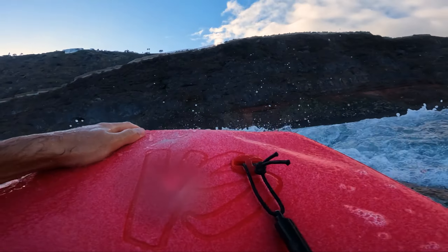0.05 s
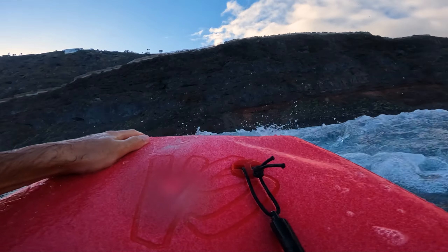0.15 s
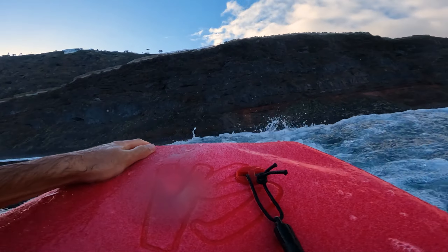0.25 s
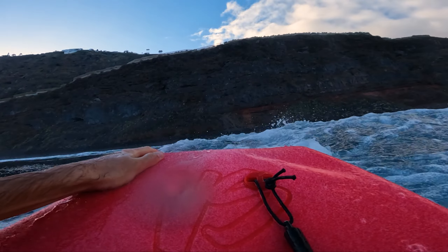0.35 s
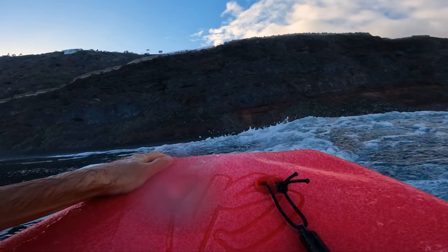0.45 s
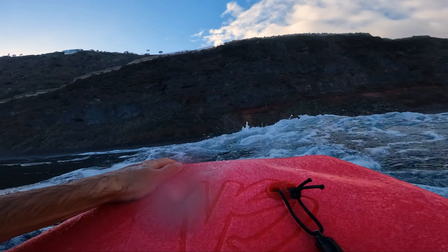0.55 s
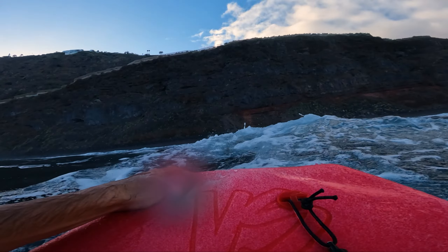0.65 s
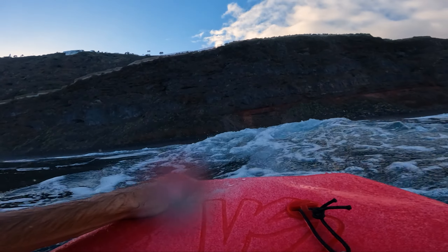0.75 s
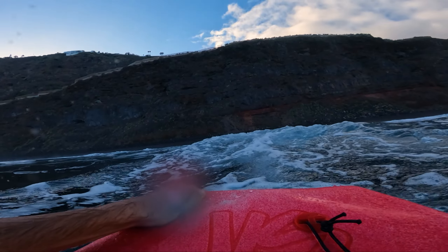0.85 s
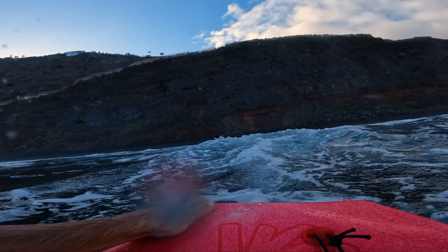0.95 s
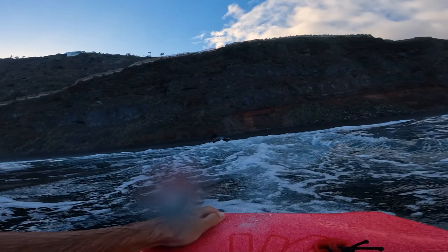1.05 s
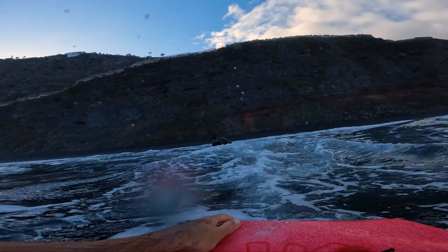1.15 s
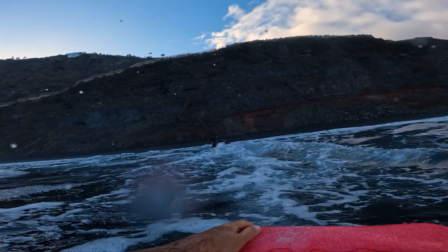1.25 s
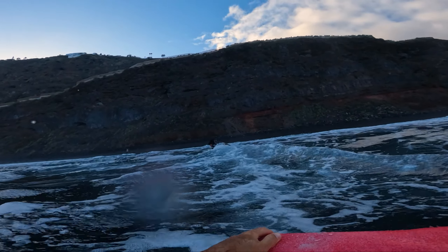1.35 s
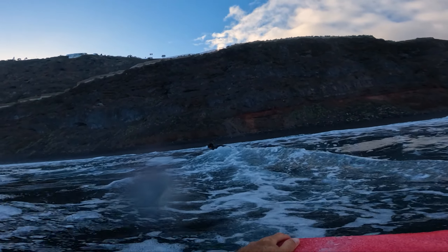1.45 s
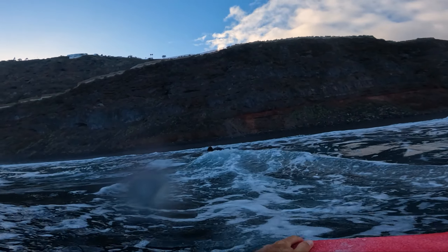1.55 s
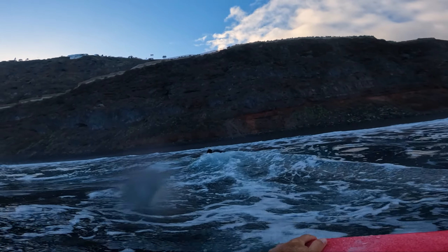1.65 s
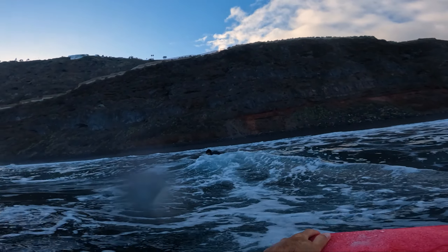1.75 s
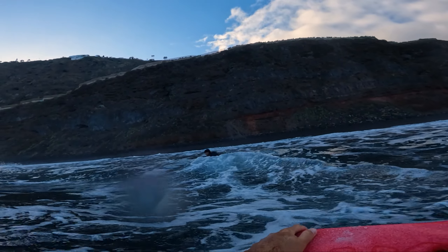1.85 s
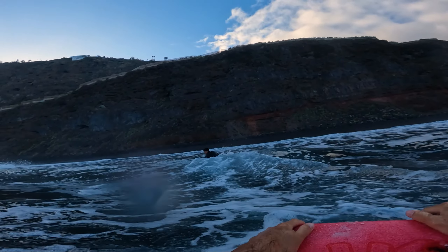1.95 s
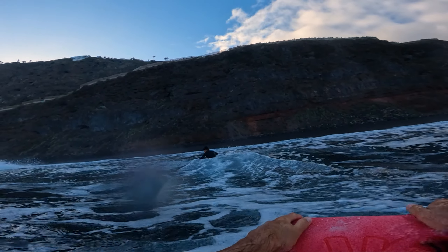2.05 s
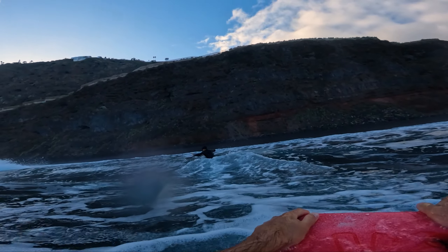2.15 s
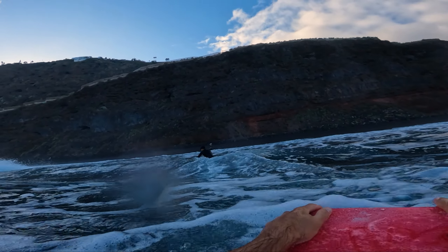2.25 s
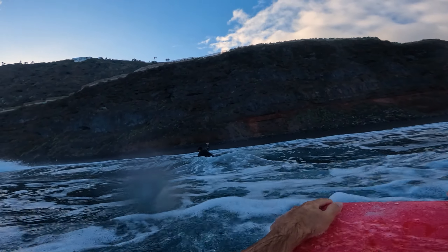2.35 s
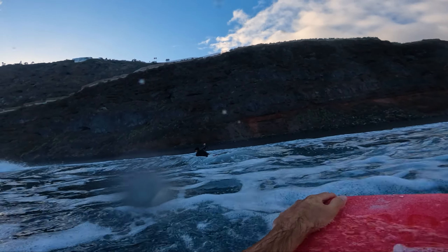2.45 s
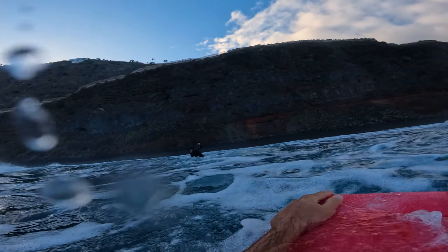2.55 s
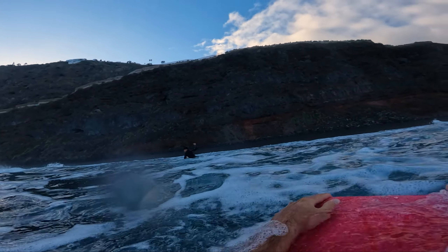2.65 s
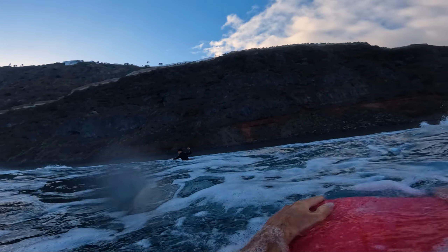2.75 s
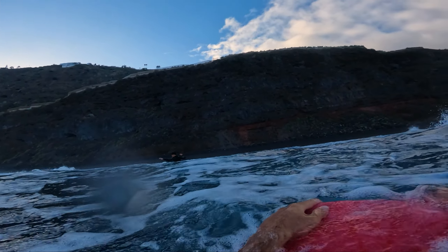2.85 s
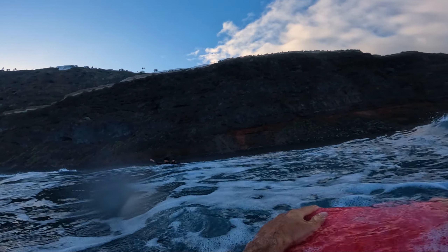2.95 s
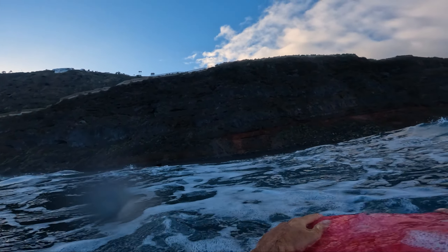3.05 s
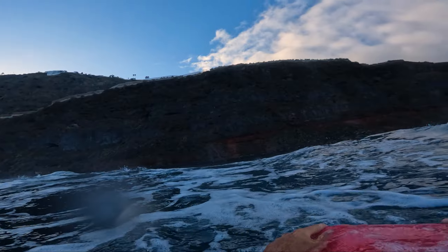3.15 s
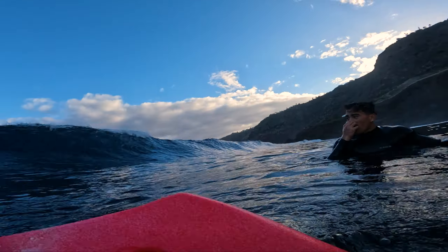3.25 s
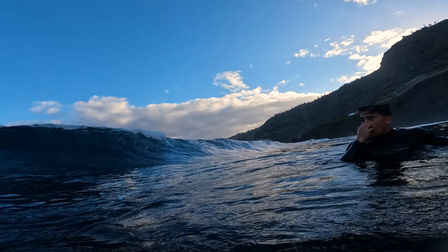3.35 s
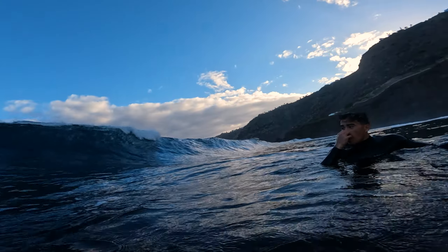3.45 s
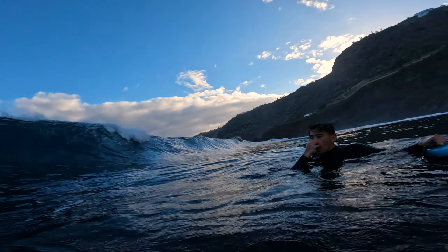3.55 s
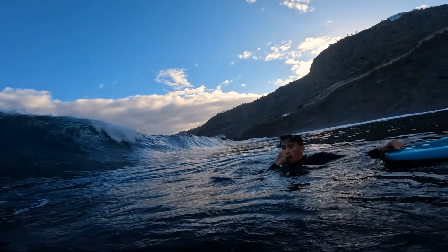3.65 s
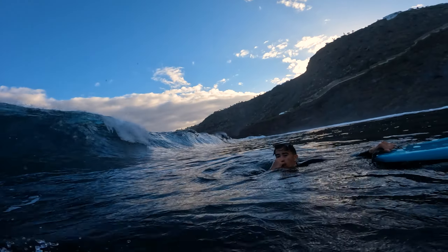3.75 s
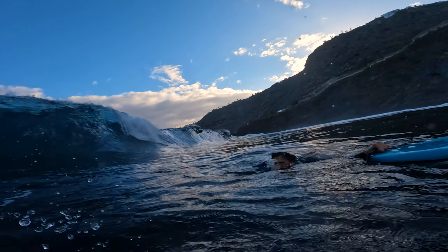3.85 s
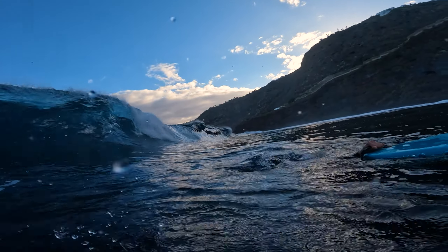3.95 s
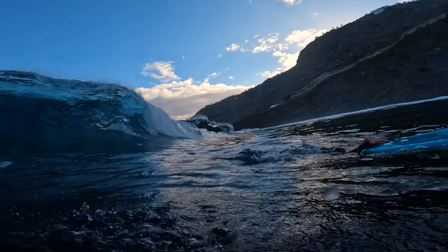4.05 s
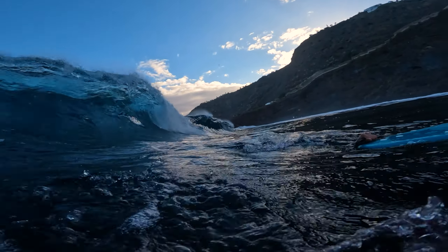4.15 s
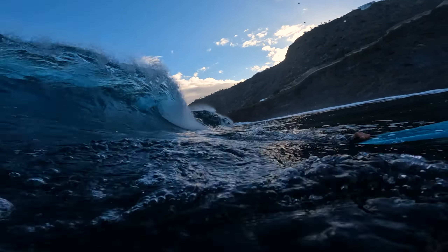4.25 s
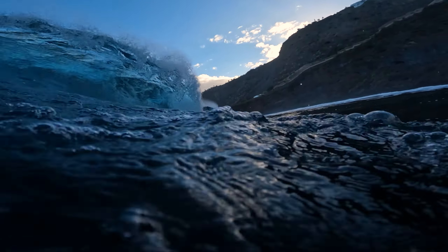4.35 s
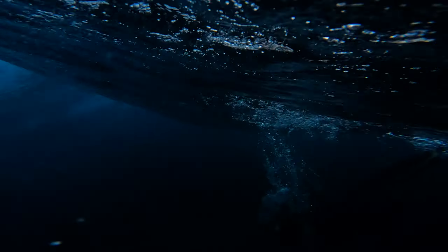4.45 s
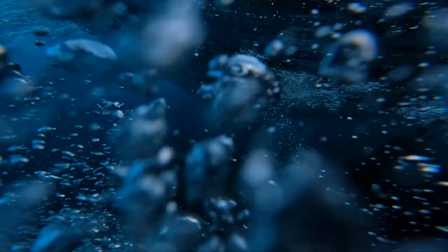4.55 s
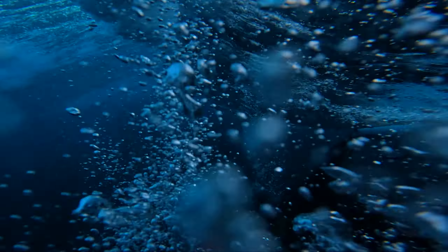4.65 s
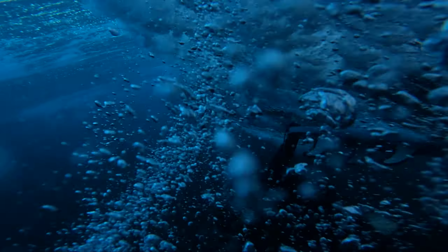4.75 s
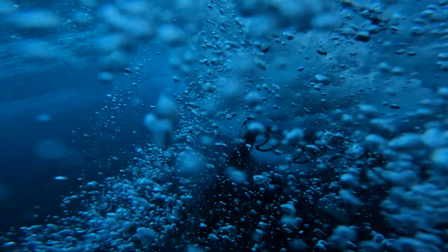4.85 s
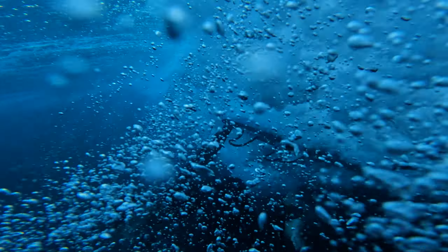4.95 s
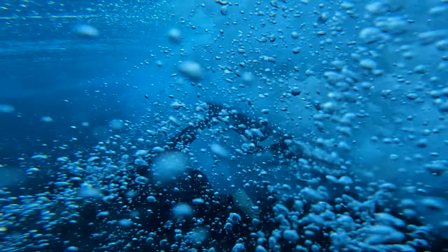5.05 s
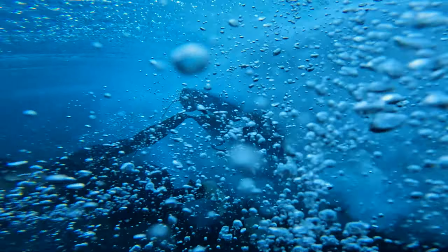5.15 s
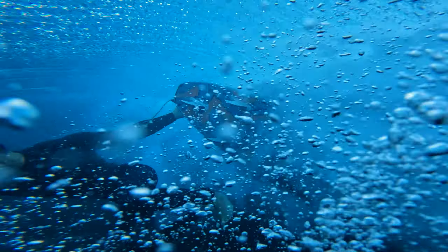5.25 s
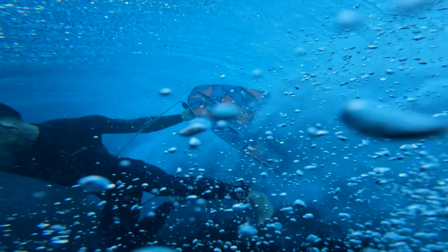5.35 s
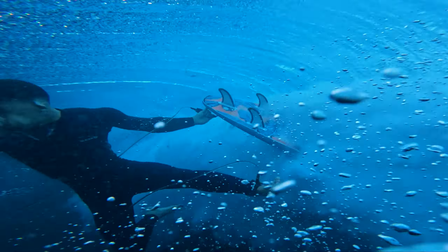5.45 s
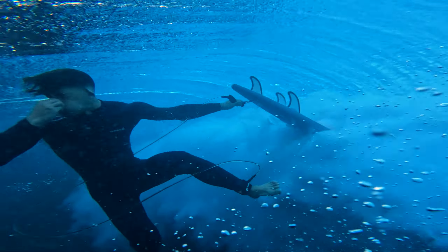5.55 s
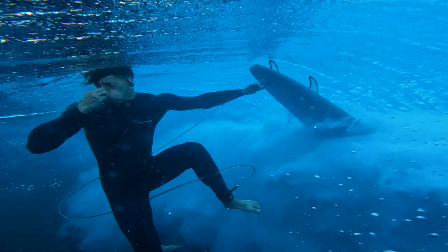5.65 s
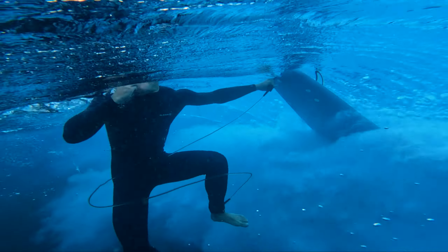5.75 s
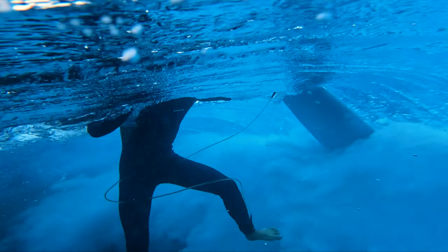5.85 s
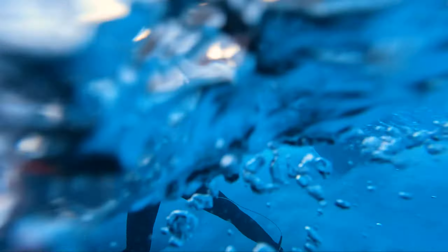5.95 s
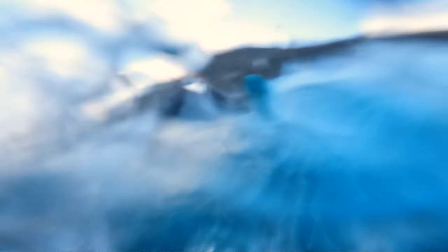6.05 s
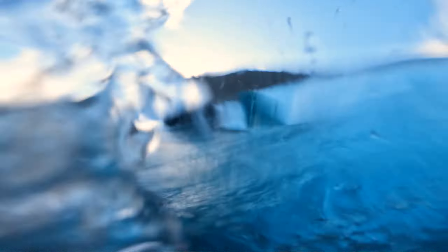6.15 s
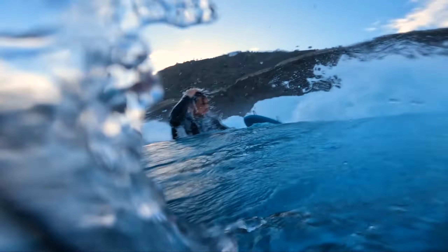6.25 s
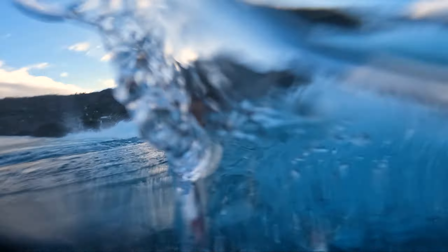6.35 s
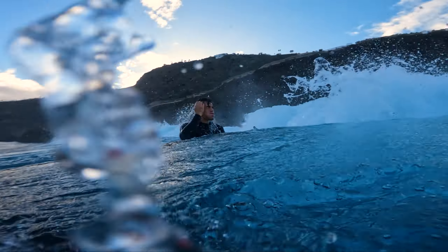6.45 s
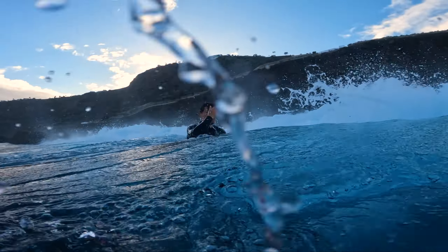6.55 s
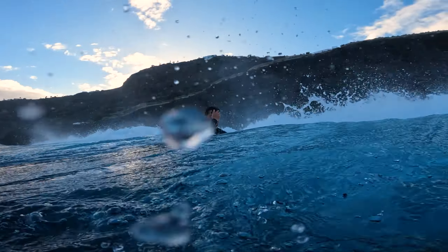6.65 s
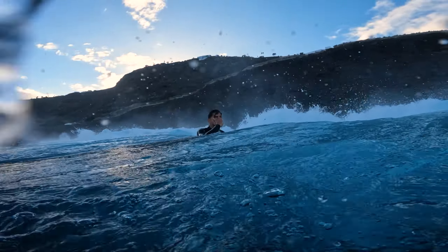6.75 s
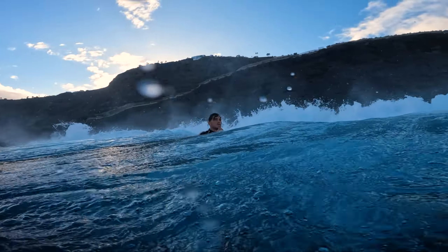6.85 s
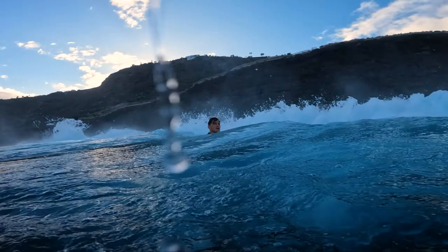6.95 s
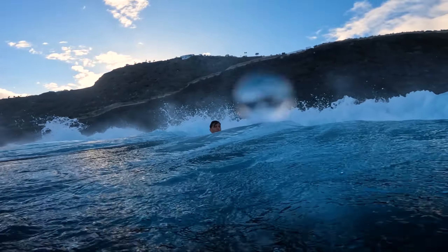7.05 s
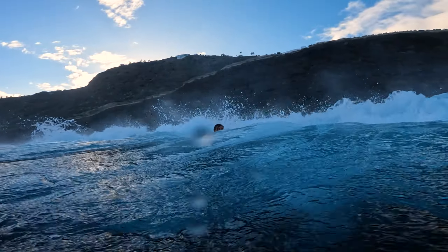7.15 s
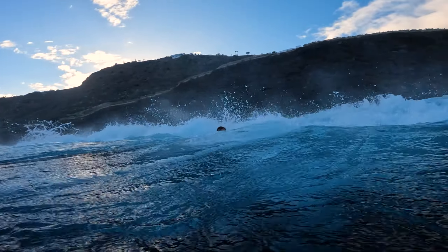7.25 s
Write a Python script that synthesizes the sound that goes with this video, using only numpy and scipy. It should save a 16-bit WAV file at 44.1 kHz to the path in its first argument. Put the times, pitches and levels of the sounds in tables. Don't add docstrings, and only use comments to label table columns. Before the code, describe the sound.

Close on a board in the surf, a microphone behind a soaked waterproof cover hears dull roaring water with faint foam hiss. The scene cuts to quieter, heaving swell; a wave slams with a boom and brief bright rush. Underwater, the roar turns hollow with gurgling bubbles, then the camera surfaces in thick glugs, slaps and draining water.

```python
import sys
import numpy as np
from scipy import signal
from scipy.io import wavfile
from scipy.ndimage import uniform_filter1d

SR = 44100
rng = np.random.default_rng(int(sys.argv[2]) if len(sys.argv) > 2 else 0)


def store_wav(level_fs):
    pcm = np.round(np.clip(np.atleast_2d(level_fs), -1, 1) * 32767)
    wavfile.write(sys.argv[1], SR, pcm.T.astype(np.int16))


def level_to_linear(level):
    exponent = np.asarray(level, float) / 20
    return 10 ** exponent


N = 321930

# time [s], force [dB], weight of water [dB],
# air trapped in the port [dB].
SURF_COURSE = [(0.0, -27, -2.5, -7), (0.47, -29, 4, -1), (0.6, -25.5, 2.5, -0.5), (1.25, -21.5, 3.5, -7),
               (1.8, -18.5, -7.5, -4), (2.05, -20.5, -2.5, -2.5), (2.62, -18, -5, -11.5),
               (3.312, -19.5, -3, -4.5), (3.322, -33.5, 1, -1), (3.92, -30.5, -4, 1.5),
               (4.47, -23.5, 0.5, 0.7), (4.62, -14, -4, -11), (4.95, -26, 4.5, -1), (5.36, -22, -4, -18),
               (5.8, -25, 4, 0.5), (6.8, -21, 1.5, -4), (6.89, -27, -0.5, -4), (7.29, -21, -3, -6.5)]
# time [s], strength [dB],
# half length [s], pitch [Hz].
PORT_GULPS = [(1.524, -4.5, 0.26, 250), (3.452, -10, 0.049, 706), (3.528, -4, 0.065, 593),
              (3.688, 11.5, 0.029, 320), (3.767, -0.5, .06, 250), (3.921, 6, 0.016, 606),
              (4.057, 10, 0.19, 70), (4.492, 10.5, 0.028, 250), (4.511, -15.5, 0.063, 402),
              (4.565, 16.5, 0.044, 560), (4.675, 1.5, 0.055, 189), (5.38, 6, 0.07, 230),
              (5.443, -8.5, 0.023, 236), (5.52, 4.5, 0.048, 250), (5.574, -4, 0.036, 150),
              (5.784, -6, 0.031, 250), (5.831, 7, 0.037, 199), (5.996, 8.5, 0.099, 620),
              (6.088, 9, 0.076, 60), (5.449, 14.5, 0.049, 750), (6.125, 21, 0.014, 200),
              (6.138, -16, 0.096, 200), (6.194, 24, 0.025, 151), (6.256, -12, 0.082, 120),
              (6.278, 16, 0.016, 80), (6.395, -6.5, 0.082, 606), (6.426, 8, 0.086, 60),
              (6.446, -11, 0.054, 80.4), (6.59, -11, 0.098, 196), (6.823, 2, 0.016, 298),
              (3.353, -16, 0.046, 150), (3.523, 5.5, 0.043, 190), (5.867, -16.5, .014, 700),
              (6.233, -12, 0.047, 700), (6.36, -5, 0.016, 500), (6.54, 4, 0.032, 600),
              (4.303, -2.5, 0.14, 750), (5.297, 2, 0.083, 230), (1.93, 1.5, 0.069, 560),
              (6.673, 1, 0.033, 700)]
# time [s], pitch [Hz].
PORT_PITCH = [(0, 553), (3.31, 555), (3.33, 599), (4.2, 665.5), (4.55, 554), (4.68, 710), (4.78, 852),
              (4.9, 778), (4.96, 618), (5.15, 634), (5.3, 737), (5.5, 652), (5.63, 843), (5.85, 676),
              (5.96, 579), (6.01, 718), (6.04, 595), (7.3, 585)]
# time [s], submerged share [0-1].
DEPTH = [(0, 0), (4.45, 0.16), (4.58, 0.06), (4.66, 0.36), (4.9, 0.74), (5.55, 0.95), (5.8, 0), (6.1, 0.28),
         (7.3, 0.02)]
# time [s], share [0-1].
PORT_WETNESS = [(0, 0.07), (4.5, 0.55), (4.58, 0.74), (6.8, 1), (6.9, 0.4), (7.3, 0.1)]
# frequency [Hz], level [dB per Hz].
MUFFLED_TONE = [(12, -32), (20, -6.5), (52, 5), (82, 2), (233, -4.5), (293, -2.5), (461, -6), (605, -6),
                (1040, -27.5), (1140, -31), (1800, -51.5), (2370, -58), (4580, -67), (5950, -96.5),
                (10100, -120)]
# frequency [Hz], level [dB per Hz].
DROWNED_TONE = [(59, -30.5), (100, -9), (184, -9.5), (315, -13.5), (362, -19), (533, -30.5), (627, -5.5),
                (744, -9), (1300, -33.5), (1690, -61.5), (2860, -120)]
# time [s], foam [dB], brightness [dB].
FOAM_COURSE = [(0.0, -47, -20), (0.46, -46.5, -20), (1.0, -39.5, -11), (1.57, -46.5, -17), (1.95, -36, -19),
               (2.26, -43, -20.5), (2.68, -40.5, -17.5), (3.15, -43.5, -19.5), (3.312, -39.5, -17),
               (3.322, -53, -15), (3.51, -39.5, -18.5), (3.88, -43.5, -21.5), (4.1, -36.5, -20.5),
               (4.41, -35.5, -21.5), (4.6, -31, -16), (5.03, -54, -27.5), (5.6, -52.5, -9.5),
               (7.29, -54.5, -13.5)]
# time [s],
# strength [dB], half length [s], brightness [dB].
SPLASHES = [(0.113, -2.5, 0.11, -2), (0.78, 12, 0.02, -18), (0.81, -4.5, 0.096, 0), (1.198, -1, 0.017, -5),
            (1.229, 13, 0.025, -5.5), (1.828, 4.5, 0.048, -2.5), (1.275, 1.5, 0.11, 5),
            (3.452, -9.5, 0.058, 4.5), (3.696, 1.5, 0.015, 7.5), (4.486, 3.5, 0.063, -1),
            (4.548, -4, 0.062, 6), (4.874, 7.5, 0.14, -3), (5.137, 9, 0.19, -1.5), (5.298, -2, .03, 7.5),
            (5.453, -10, 0.031, 13), (5.48, -10, 0.042, 4), (5.526, 4, 0.046, 1.5),
            (5.628, 19.5, 0.045, -21), (5.728, 6, 0.11, 5.5), (5.835, 14.5, 0.028, -5),
            (5.866, -15, 0.022, -1), (5.942, 14, 0.016, -5), (6.043, 0, 0.059, 11.5),
            (6.09, 16.5, 0.16, -1.5), (6.21, -18, 0.035, 11), (6.33, 6, 0.044, -2), (6.398, -11, 0.062, 13),
            (6.453, 16, 0.018, -11.5), (6.73, 9.5, 0.13, 5.5), (7.124, 9.5, 0.28, -8), (3.61, 2, 0.069, 1),
            (3.983, -1.5, 0.037, 3), (6.005, 1.5, 0.036, 10), (6.131, -18, 0.0079, 0),
            (6.153, -4, .006, -3), (6.18, 7, .02, -12), (6.525, 6.5, 0.058, 2), (6.66, 11, 0.019, -10),
            (5.89, 1, .02, -2), (5.565, 12, 0.024, -15), (1.004, 0.5, 0.071, -4.5), (5.97, -4, 0.017, 11.5)]
# frequency [Hz], level [dB per Hz].
SPRAY_TONE = [(1200, -16), (2100, -1.5), (3050, -6), (3900, -14.5), (5500, -23), (7500, -34),
              (11000, -66.5)]
# time [s], level [dB].
HEAVE_COURSE = [(0.0, -34), (0.41, -53.5), (1.97, -22), (3.31, -32.5), (3.32, -29), (3.37, -17),
                (3.61, -26), (3.81, -15), (3.98, -20), (4.03, -25.5), (4.19, -32.5), (4.47, -33),
                (4.47, -15.5), (4.82, -40.5), (5.6, -18.5), (6.3, -33), (6.81, -41), (7.29, -38)]
# start [s], peak [dB], pitch [Hz].
GLUGS = [(0.554, -9, 552), (2.003, -9, 553), (3.524, -10, 503), (4.622, -3, 622), (4.681, -9, 755),
         (4.776, 0, 423), (4.801, -10.5, 877), (4.824, -9, 830), (4.877, -7, 786), (4.952, -9, 583),
         (4.982, -14.5, 722), (5.185, -16.5, 720), (5.441, -10, 688), (5.542, -4, 567), (5.574, -8, 526),
         (5.616, -19.5, 866), (5.744, -7, 633), (5.811, -21, 662), (5.85, 0.5, 510), (5.909, -9, 715),
         (5.943, -2, 570), (5.999, -0.5, 643), (6.021, 5, 552), (6.115, -6, 357), (6.281, -1, 355),
         (6.332, -0.5, 487), (6.387, -8, 432), (6.448, -6.5, 552), (6.737, -10, 517),
         (3.647, -10, 622), (3.929, -17, 800), (4.093, -28, 593), (4.215, -18, 770), (4.312, -9, 547),
           (4.552, 4, 533), (4.652, -14, 640), (4.714, -19, 450), (4.736, -22, 680), (4.905, -13, 438),
           (5.019, -17, 693), (5.109, -22, 627), (5.136, -21.5, 616), (5.157, -19, 618), (5.227, -20, 810),
           (5.348, -17.5, 810), (5.629, -15, 750), (5.649, -17, 860), (5.691, -19, 637), (5.709, -10, 523),
           (5.787, -16, 708), (5.88, -15, 555), (5.975, -13, 597), (6.51, -12, 543), (6.534, -20, 565),
           (6.554, -26, 650), (6.649, -19, 655), (6.334, -16.5, 613)]
# start [s], peak [dB], pitch [Hz].
BLIPS = [(1.2161, -29, 1140), (3.549, -36, 1090), (3.5975, -23.5, 1140), (3.693, -16.5, 1040),
         (3.9766, -24, 1070), (4.6823, -14, 1200), (4.786, -26, 1460), (4.8803, -32.5, 1280),
         (4.9054, -19.5, 1190), (4.979, -28, 1220), (5.095, -28, 1160), (5.187, -39, 1500),
         (5.3454, -28, 1040), (5.3906, -25.5, 1020), (5.408, -42, 1480), (5.04, -34, 1260),
         (5.6158, -20, 1245), (5.639, -39, 1120), (5.649, -37, 1090), (5.7444, -39, 1060),
         (5.7818, -37, 1460), (5.8247, -34, 1410), (5.9714, -27.5, 1340), (5.9887, -23, 1080),
         (6.0107, -16, 1100), (6.044, -23, 1260), (6.0736, -24, 1080), (6.309, -37, 1060),
         (6.323, -36, 1070), (6.4305, -32.5, 1310), (6.4457, -21.5, 1120), (6.5124, -33, 1060),
         (6.647, -37, 1040)]
# start [s], peak [dB], pitch
# [Hz].
PLINKS = [(0.765, -31, 1950), (.766, -29, 2590), (1.134, -25, 1900), (1.216, -32.5, 1790),
          (4.486, -16, 1600), (4.4948, -2, 1596), (4.5224, -21, 1630), (4.744, -36, 4000),
          (4.754, -28, 2060), (4.786, -22.5, 1710), (4.837, -36, 1740), (4.8796, -29, 1860),
          (4.9135, -27, 1870), (4.956, -27.5, 1980), (5.125, -39, 2670), (5.128, -23.5, 1750),
          (5.297, -35.5, 1674), (5.731, -34, 1800), (5.831, -32.5, 1620), (5.943, -11.5, 1236),
          (6.165, -37, 1820), (6.004, -26, 1810), (6.0473, -26, 2090), (5.165, -39.5, 2060),
          (6.156, -43, 1730), (6.4449, -37.5, 1880), (6.4977, -37, 1900), (6.5347, -36.5, 1950),
          (5.195, -40, 1850), (5.5812, -44, 2070), (5.6244, -49, 3140), (5.6386, -44, 2220),
          (5.7039, -35.5, 2660), (5.8321, -33, 2160), (5.8835, -55, 2310), (5.9574, -47, 2080),
          (5.9718, -44, 2360), (5.9818, -32, 2060), (5.9964, -41, 2310), (6.0164, -40, 2160),
          (6.0264, -35, 2420), (6.0364, -40, 2010), (6.0472, -36, 2210), (6.0594, -41, 2220),
          (6.0731, -37, 2660), (6.0824, -48, 2230), (6.1024, -47, 2790), (4.995, -49, 2100),
          (6.5124, -51, 2010), (6.6473, -53, 2010)]
# start [s], peak [dB], pitch [Hz], 60 dB decay [s].
MESH_RINGS = [(4.739, -51, 4230, 0.072), (4.762, -21, 877, 0.16), (4.832, -18, 825, 0.2),
              (4.844, -23, 1250, 0.059), (5.945, -35.5, 1250, 0.052), (5.946, -39, 1880, 0.056),
              (6.094, -40, 1800, 0.05), (6.162, -47.5, 1800, 0.1), (5.20, -25, 748, 0.14),
              (5.44, -15, 658, 0.2), (5.708, -58, 4000, 0.041), (5.452, -44, 1510, 0.081)]
# start [s], peak [dB], pitch [Hz].
THUDS = [
    (4.493, 5, 63.8),
    (5.785, -3.5, 86.7),
    (5.939, -19.5, 71.1),
    (6.271, -9, 74.5),
    (6.478, 4, 83),
    (6.661, -17, 102),
    (4.616, -5, 199),
    (4.65, 21, 184),
    (6.196, 9, 292),
    (6.822, 11.5, 558),
]
# start [s], peak [dB], dull part above the bright [dB],
# length [s].
DROPS = [(0.767, -42, -1, 0.005), (0.81, -58, 2, .0009), (3.387, -53, -3, 0.002),
         (3.6854, -52, -14, 0.0023), (4.495, -10, 2.5, 0.0027), (4.528, -20, -2, 0.0013),
         (4.5306, -14, -8, 0.0019), (4.548, -29, 13.5, 0.0019), (4.617, -40, 4, 0.003),
         (4.712, -39, 12, 0.0036), (4.835, -42, 0, 0.0022), (4.877, -41.5, 5, 0.0074),
         (5.675, -50, -4, .0026), (5.705, -43, 7, 0.0017), (5.73, -48, 10, 0.0031), (5.824, -51, 8, 0.0011),
         (5.939, -54, -7, .0026), (6.007, -45, 2, 0.0014), (6.0726, -46, 2, 0.0016),
         (6.3376, -49, 8, 0.004), (6.649, -52, 6, .002), (6.717, -50, -3, 0.0014), (4.738, -46, -2, .0015),
         (5.672, -48, -3, 0.0013), (0.782, -42, 4, 0.0025), (5.798, -51, 2, 0.0011),
         (5.884, -63, 15, 0.0022), (6.037, -44, -1, 0.00084), (6.061, -45, 0, .0015),
         (6.105, -45, -2, 0.0014), (6.31, -58, 13, 0.0022), (6.447, -61, 15, 0.0028),
         (6.512, -64, 10.5, .002), (6.826, -52, 5, .002), (5.772, -56, 0, .0015), (5.957, -52, 0, 0.0018)]
# start [s], peak [dB], dull part above the bright [dB], length [s].
SLAPS = [
    (1.136, -43, 3, .0015),
    (1.2145, -30, 3, .007),
    (6.114, -36, 7, .0012),
    (6.138, -29, 5, .0012),
    (6.1555, -29, 4, .0015),
    (6.199, -52, 3, .001),
]
# start [s], level [dB], pitch [Hz], length [s].
MISTS = [
    (0.858, -55.5, 2950, 0.25),
    (1.245, -61, 3480, 0.13),
    (6.08, -66, 4900, 0.072),
    (6.167, -68, 4840, 0.028),
]
# time [s], level [dB].
SLAM_COURSE = [(4.506, -52), (4.519, -24), (4.533, -14), (4.542, -17), (4.552, -20), (4.57, -33),
               (4.62, -38), (4.72, -38.5), (4.745, -68)]
# frequency [Hz], level [dB per Hz].
SLAM_TONE = [(700, -2.5), (1400, -1.5), (1900, -12.5), (2900, -20), (4500, -33.5), (6500, -41.5),
             (9500, -62.5), (13000, -71), (16000, -99)]
# time [s], height [dB].
JUMPS = [
    (3.3184, -11),
    (3.3248, -30),
    (4.496, -38),
    (5.673, -42),
    (5.678, -37),
    (5.684, -40),
    (6.826, -54),
    (5.553, -60),
    (6.281, -57),
    (6.378, -57),
]

SOAKED = 0.71


def evened(x):
    return x / np.sqrt(np.mean(x ** 2) + 1e-20)


def read(points, hz):
    f, value = np.transpose(points)
    return np.interp(np.log(hz + 1), np.log(f + 1), value)


def follow(*tables):
    s, *columns = np.concatenate(tables).T
    return [np.interp(np.arange(N) / SR, s, c) for c in columns]


def swells(times, halves, heights):
    out = np.zeros(N)
    for s, half, db in zip(times, halves, heights):
        away = np.abs(np.arange(-half, half, 1 / SR)) / half
        add(out, s - half, db * np.minimum(1.065 * (1 - away), 1))
    return out


def add(mix, s, sound):
    part = mix[round(s * SR):][:len(sound)]
    part += sound[:len(part)]


def flutter(hz):
    return evened(signal.sosfilt(signal.butter(2, hz, fs=SR, output="sos"), rng.standard_normal(N)))


def clicks(per_s, spread_db):
    size = level_to_linear(spread_db * np.minimum(rng.exponential(1, N), 4))
    sign = rng.choice([-1., 1.], N)
    return evened(size * sign * (rng.random(N) < per_s / SR))


def blend(a, b, share):
    share = np.clip(share, 0, 1)
    return np.sqrt(1 - share) * a + np.sqrt(share) * b


def colour(x, tone, lo_hz, hi_hz, patchy_db):
    hz, _, z = signal.stft(x, SR, nperseg=1024, noverlap=768)
    band = 1 / np.sqrt((1 + (lo_hz / (hz + 1)) ** 8) * (1 + (hz / hi_hz) ** 8))
    patches = uniform_filter1d(rng.standard_normal(z.shape), size=6, axis=0)
    patches = uniform_filter1d(patches, size=8, axis=1)
    z = z * (band * level_to_linear(read(tone, hz)))[:, None] * level_to_linear(patchy_db * evened(patches))
    return evened(signal.istft(z, SR, nperseg=1024, noverlap=768)[1][:N])


def resonate(x, hz, width):
    turn = np.exp(2j * np.pi * np.cumsum(hz) / SR)
    r = np.exp(-np.pi * width / SR)
    return 2 * (turn * signal.lfilter([1 - r], [1, -r], x / turn)).real


def dulled(x, hz):
    return signal.sosfilt(signal.butter(4, hz, fs=SR, output="sos"), x)


def bubble(db, hz, t60, rise, onset=3):
    t60 = np.clip(t60, .008, .2)
    t = np.arange(0, t60, 1 / SR)
    swing = np.sin(2 * np.pi * hz * (t + rise * t ** 2 / t60))
    fade_in = np.sin(np.pi / 2 * np.minimum(t * hz / onset, 1)) ** 2
    return level_to_linear(db - 60 * t / t60) * swing * fade_in


def surf_controls():
    force_db, weight_db, air_db = follow(SURF_COURSE)
    s, db, half, hz = np.transpose(PORT_GULPS)
    reach = 1.25
    low, mid, top = (swells(s, half, db * np.exp(-(np.log2(hz / layer_hz) / reach) ** 2))
                     for layer_hz in (70, 250, 556))
    bubbling = .3 + np.maximum(follow(PORT_WETNESS)[0] - SOAKED, 0)
    return force_db + weight_db + low, force_db + mid, force_db + air_db + top, bubbling


def port_pockets(depth):
    pitch = follow(PORT_PITCH)[0] * (1 + 0.089 * flutter(hz=29.2))
    ringing = resonate(clicks(550, spread_db=1.5), pitch, 55)
    ringing = resonate(ringing, pitch, 530)
    pockets = evened(dulled(ringing, hz=1250))
    thin = signal.sosfilt(signal.butter(4, 580, "highpass", fs=SR, output="sos"), pockets)
    return (1 - depth) * pockets + depth * evened(thin)


def surf():
    rumble_db, roar_db, port_db, bubbling = surf_controls()
    depth = follow(DEPTH)[0]
    a, b, c = rng.standard_normal((3, N))
    rumble = colour(a, MUFFLED_TONE, 26, 130, patchy_db=0.0)
    roar_above = colour(b, MUFFLED_TONE, 130, 420, patchy_db=-1.5)
    roar_below = colour(c, DROWNED_TONE, 140, 290, patchy_db=1.5)
    roar = blend(roar_above, roar_below, depth)
    broad_above = colour(c, MUFFLED_TONE, 420, 950, patchy_db=1.0)
    broad_below = colour(b, DROWNED_TONE, 740, 1100, patchy_db=5.5)
    broad = blend(broad_above, broad_below, depth)
    port = blend(broad, port_pockets(depth), bubbling)
    lumps = level_to_linear(0.73 * flutter(hz=8.2))
    return level_to_linear(rumble_db) * rumble + lumps * (level_to_linear(roar_db) * roar + level_to_linear(port_db) * port)


def foam_controls():
    foam_db, bright_db = follow(FOAM_COURSE)
    s, db, half, tint_db = np.transpose(SPLASHES)
    wash_db = foam_db + swells(s, half, db)
    return wash_db, wash_db + bright_db + swells(s, half, tint_db)


def foam(wash_db, spray_db):
    wet = follow(PORT_WETNESS)[0]
    drive = blend(rng.standard_normal(N), clicks(500, spread_db=2.5), .8 * wet - .07)
    drive = drive * level_to_linear(1.5 * flutter(hz=30))
    wash = colour(drive, MUFFLED_TONE, 1240, 1800, patchy_db=2.5)
    spray = colour(drive, SPRAY_TONE, 1800, 12000, patchy_db=2.0)
    soaked = np.clip(3.5 * (wet - SOAKED), 0, .9)
    spray = (1 - soaked) * spray + soaked * dulled(dulled(spray, hz=4300), hz=4600)
    return level_to_linear(wash_db + 2.0) * wash + level_to_linear(spray_db - 3.0) * spray


def fizz(wash_db):
    swarm = np.zeros(N)
    for hz in np.geomspace(900, 1900, num=7):
        one = bubble(-11 * np.log2(hz / 900), hz, 40 / hz, rise=0.076)
        swarm += signal.oaconvolve(clicks(30, spread_db=2.5), one)[:N]
    return level_to_linear(wash_db - 1.0) * follow(PORT_WETNESS)[0] * evened(dulled(swarm, hz=4000))


def heave():
    push = np.sin(2 * np.pi * np.cumsum(14.0 + 3.5 * flutter(hz=3)) / SR)
    level_db = uniform_filter1d(follow(HEAVE_COURSE)[0], size=300)
    return level_to_linear(level_db) * evened(np.tanh(2.4 * push))


def bubbles():
    large, small = np.zeros((2, N))
    for s, db, hz in GLUGS:
        t60 = 0.028 * level_to_linear(-0.43 * db)
        add(large, s, bubble(db - 0.5, hz, t60, rise=0.011, onset=2.2))
    for s, db, hz in THUDS:
        add(large, s, bubble(db - 6.5, hz, 9 / hz, rise=0.041))
    for s, db, hz in BLIPS:
        add(small, s, bubble(db - 0.5, hz, 30 / hz, rise=0.034, onset=2.1))
    for s, db, hz, t60 in MESH_RINGS:
        add(small, s, bubble(db, hz, t60, rise=0.013))
    for s, db, hz in PLINKS:
        add(small, s, bubble(db - 4.0, hz, 42 / hz, rise=0.035))
    ragged = small * level_to_linear(2.0 * flutter(hz=250))
    return dulled(large, hz=1800) + dulled(ragged, hz=5000)


def drop_hits(rows):
    out = np.zeros(N)
    bright = signal.butter(2, [2100, 4300], "bandpass", fs=SR, output="sos")
    dull = signal.butter(2, [1100, 2500], "bandpass", fs=SR, output="sos")
    for s, db, dull_db, length in rows:
        noise = rng.standard_normal(1500)
        t = np.arange(len(noise)) / SR / max(length, .0003)
        contact = 5 * (np.cumsum(t > .5) == 1)
        burst = (0.35 * noise + contact) * t * np.exp(-2 * t)
        top = signal.sosfilt(bright, burst)
        low = signal.sosfilt(dull, burst)
        add(out, s, level_to_linear(db) * (top / abs(top).max() + level_to_linear(dull_db) * low / abs(low).max()))
    return out


def ticks():
    slaps = dulled(dulled(drop_hits(SLAPS), hz=3800), hz=3900)
    return dulled(dulled(drop_hits(DROPS) + slaps, hz=4340), hz=5160)


def mist():
    out = np.zeros(N)
    for s, db, hz, length in MISTS:
        band = signal.butter(2, [.87 * hz, 1.15 * hz], "bandpass", fs=SR, output="sos")
        hiss = signal.sosfilt(band, rng.standard_normal(SR // 2))[:round(length * SR)]
        add(out, s, level_to_linear(db) * evened(hiss) * np.sqrt(np.hanning(len(hiss))))
    return out


def slam():
    grit = blend(rng.standard_normal(N), clicks(900, spread_db=2.5), .45)
    grit = grit * level_to_linear(2.5 * flutter(hz=70))
    before = [(SLAM_COURSE[0][0] - .01, -120)]
    after = [(SLAM_COURSE[-1][0] + .03, -120)]
    level_db = follow(before, SLAM_COURSE, after)[0]
    return level_to_linear(level_db) * colour(grit, SLAM_TONE, 1100, 16000, patchy_db=1.5)


def scene():
    wash_db, spray_db = foam_controls()
    water = surf() + foam(wash_db, spray_db) + fizz(wash_db) + heave()
    hits = bubbles() + ticks() + mist() + slam()
    return (water + hits)[None]


def roll_off(x):
    return signal.sosfilt(signal.butter(12, 15270, fs=SR, output="sos"), x)


def record(dry):
    over = np.maximum(abs(dry) - .5, 0)
    out = dry - np.sign(dry) * .5 * over ** 2
    recovery = np.exp(-np.arange(2000) / SR / 0.0072)
    recovery = uniform_filter1d(recovery, size=2, mode="constant")
    for s, db in JUMPS:
        add(out[0], s, -level_to_linear(db) * recovery)
    out = out * np.interp(np.arange(N), [0, 200, N - 200, N], [.3, 1, 1, .35])
    out = out + level_to_linear(-107) * rng.standard_normal(out.shape)
    return roll_off(out)


dry = scene()
out = record(dry)
store_wav(out)
```